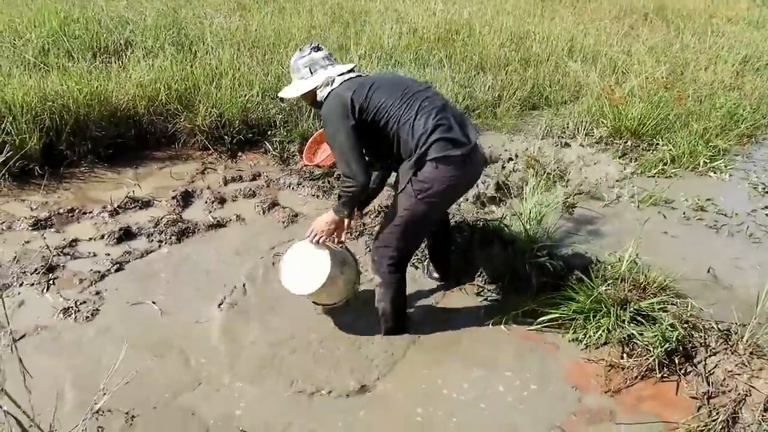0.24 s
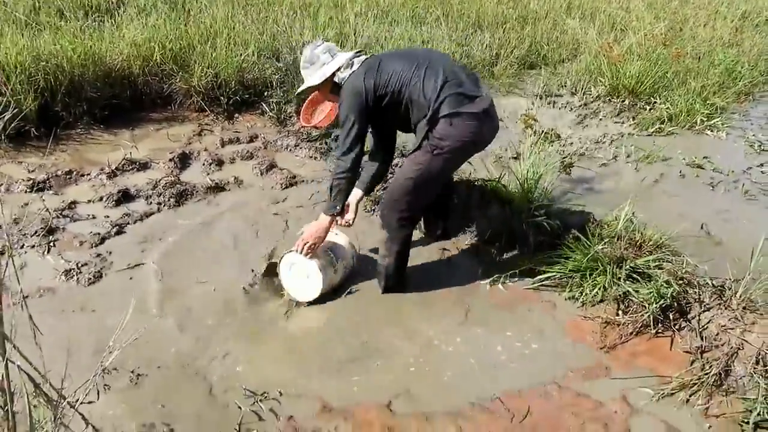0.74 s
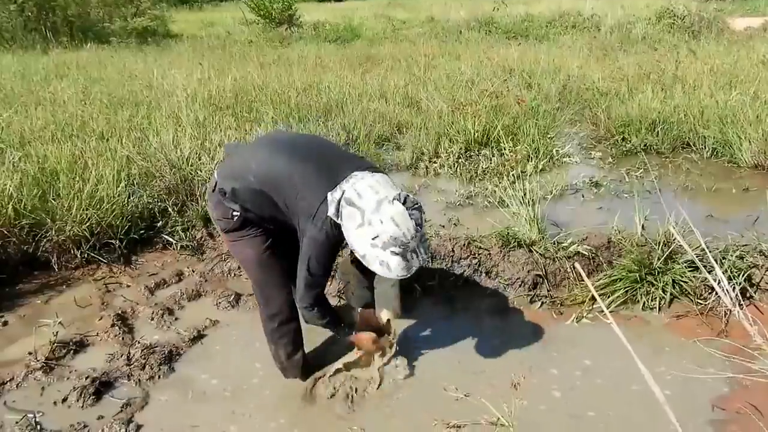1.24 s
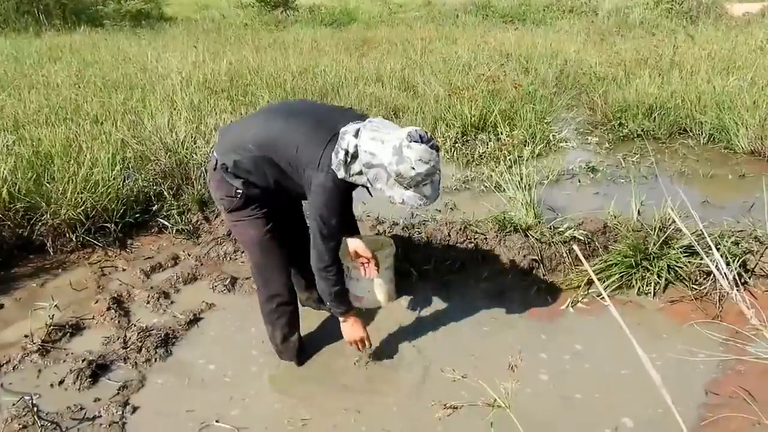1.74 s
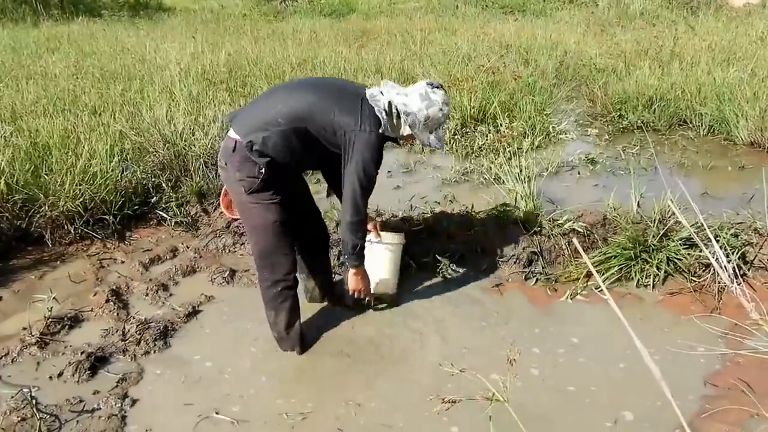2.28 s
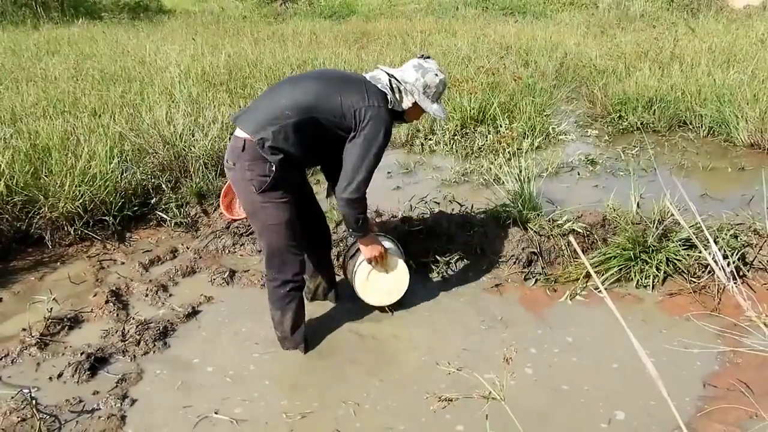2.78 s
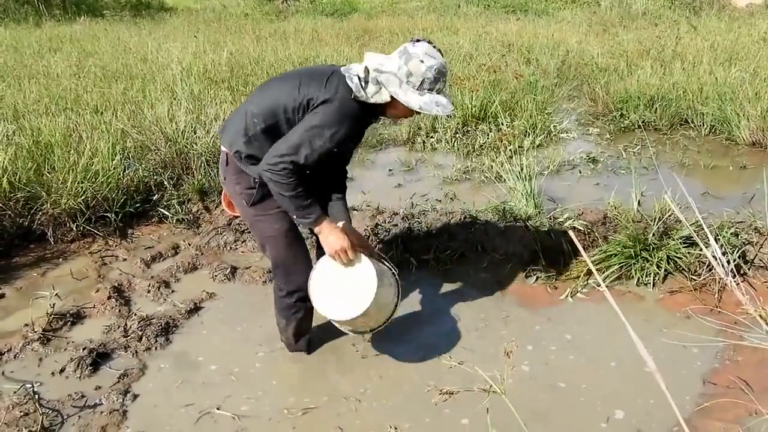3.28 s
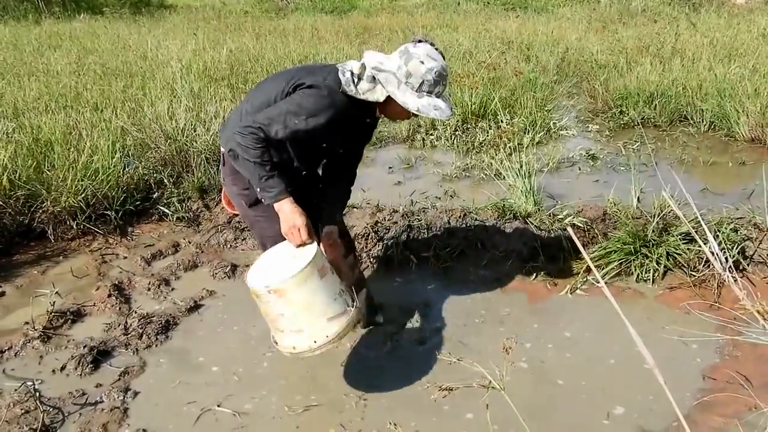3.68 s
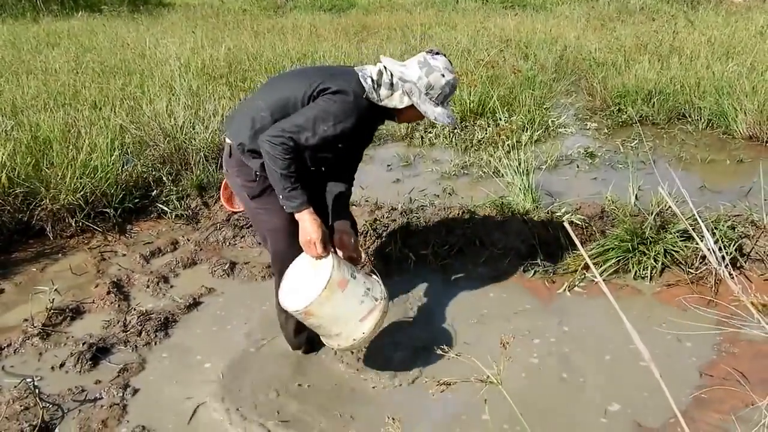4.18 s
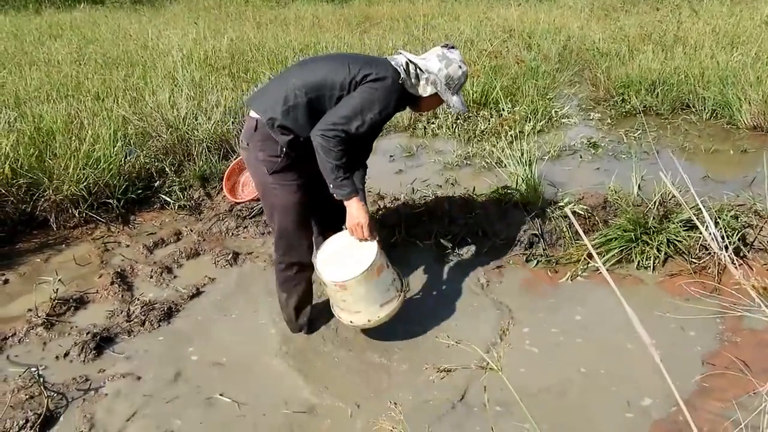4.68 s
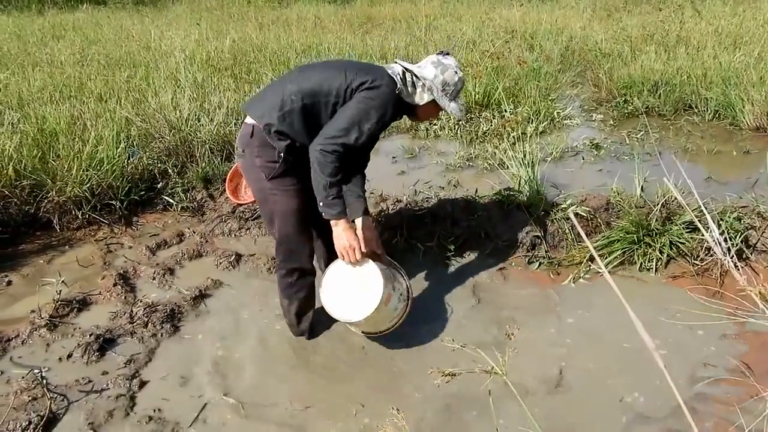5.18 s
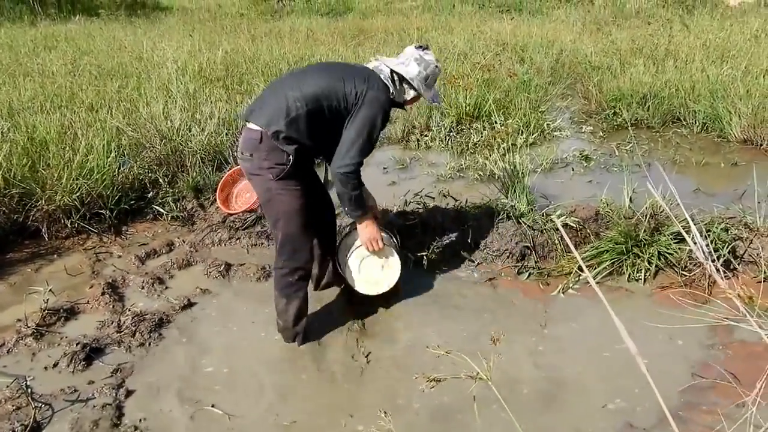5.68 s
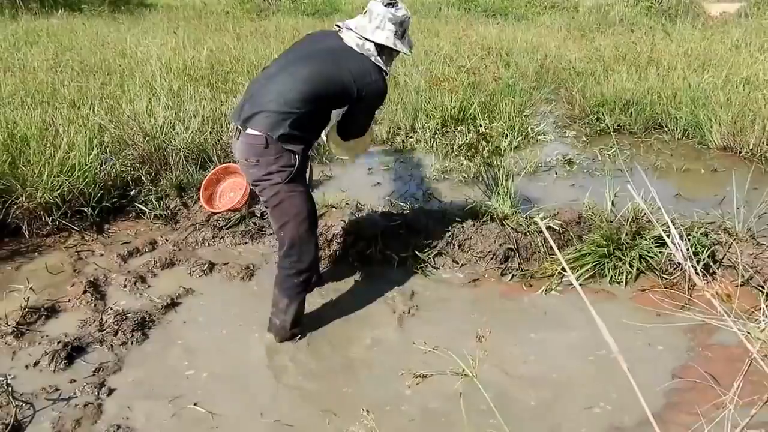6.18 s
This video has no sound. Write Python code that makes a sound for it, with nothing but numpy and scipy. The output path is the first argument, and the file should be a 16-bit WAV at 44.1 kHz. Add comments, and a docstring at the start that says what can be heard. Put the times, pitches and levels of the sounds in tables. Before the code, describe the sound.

A plastic bucket sloshes in a shallow muddy pool, heard from nearby in an open field. The loudest splash comes right at the start, with gurgling bubbles, hissing spray and a hollow thump. At 0.5 seconds everything cuts to silence until about 1 second. A faint low drone of distant traffic and two wavering engines then runs underneath. Several lighter splashes follow from 1.2 to 1.7 seconds. Between 2 and 3.5 seconds the water is quieter, with scattered drips, plops and small wet slaps, and soft bucket thumps near 2.5 seconds. From 3.7 to 4.5 seconds comes fuller sloshing and gurgling, with more dull thumps and a sharp wet slap. A lull follows, with a very faint high insect shrill around 5.4 seconds. Splashing returns at 5.6 seconds, peaks near 6 and dies away by 6.4 seconds.

```python
"""Rinsing a bucket in a muddy pool

A plastic bucket is sloshed in shallow water in an open field. Trapped air rings as gurgling bubbles,
spray hisses, drops plop, tick and slap, and the hollow bucket thumps. Far traffic and two engines
drone below; an insect shrills faintly. One splash, half a second of silence, then a longer stretch."""
import sys
import numpy as np
from scipy import signal
from scipy.fft import rfft, irfft
from scipy.io import wavfile

SR = 44100
rng = np.random.default_rng(int(sys.argv[2]) if len(sys.argv) > 2 else 0)


def dump_mix(stems):
    """Bounce the given channels to the path in sys.argv[1] as a 16-bit WAV at rate SR."""
    frames = np.atleast_2d(stems).T  # one column per channel
    limited = np.clip(frames, -1, 1)  # hard clip at full scale
    pcm = np.round(limited * 32767).astype(np.int16)
    wavfile.write(sys.argv[1], SR, pcm)


N = 284004
FIELD_PAN_DB, WATER_PAN_DB, BUCKET_PAN_DB, DROP_SCATTER_DB = 2.0, 1.5, -4, 3.5   # left minus right
SILENCE_S = (0.4985, 1.024)

def from_db(db):
    """Amplitude ratio of a level in decibels."""
    return 10 ** (np.asarray(db) / 20)

def rms_one(x):
    """Normalisation to unit rms."""
    return x / np.sqrt(np.mean(x ** 2) + 1e-20)

def in_time(rows):
    """Linear interpolation of each column in time."""
    s, *columns = np.transpose(rows)
    return [np.interp(np.arange(N) / SR, s, c) for c in columns]

def at_hz(points, hz):
    """Interpolation on a log-frequency axis."""
    freqs, values = np.transpose(points)
    return np.interp(np.log(hz), np.log(freqs), values)

def panned(db):
    """Left and right gains for a level difference."""
    return from_db(np.array([[db / 2], [-db / 2]]))

def band(x, low_hz, high_hz, order=2):
    """Butterworth band-pass filtering."""
    return signal.sosfilt(signal.butter(order, [low_hz, high_hz], "band", fs=SR, output="sos"), x)

def resonator(hz, cycles):
    """Poles of a damped oscillator that loses 60 dB in the given cycles."""
    r = from_db(-60 * hz / (cycles * SR))
    return [1, -2 * r * np.cos(2 * np.pi * hz / SR), r * r]

def drift(hz):
    """Random modulation: unit-rms noise, low-passed at hz."""
    r = np.exp(-80 * np.pi * hz / SR)
    slow = signal.lfilter([1], [1, -2 * r, r * r], rng.standard_normal(N // 40 + 2002))[2000:]
    return np.interp(np.arange(N) / 40, np.arange(len(slow)), rms_one(slow))

def coloured(pair, spectrum, coherence):
    """Mid-side mixing to a given spectrum and left-right coherence."""
    hz = np.maximum(np.fft.rfftfreq(N, 1 / SR), 1)
    alike = np.clip(at_hz(coherence, hz), 0, 1)
    mid, side = rfft(pair) * from_db(at_hz(spectrum, hz))
    return rms_one(irfft(np.sqrt(1 + alike) * mid + np.sqrt(1 - alike) * side * [[1], [-1]], N))

def grains(per_s, spread_db):
    """A Poisson process of clicks, mostly small, a few large."""
    sizes = from_db(spread_db * np.minimum(rng.exponential(1, N), 5)) * rng.choice([-1, 1], N)
    return sizes * (rng.random(N) < per_s / SR)

def add(out, s, sound):
    """Superposition of a short stereo sound at time s."""
    i = max(round(s * SR), 0)
    out[:, i:i + sound.shape[1]] += sound[:, :N - i]

def bubble(hz, t60, rise, swell_s):
    """A damped sine whose pitch climbs, as a bubble's does near the surface."""
    t = np.arange(round(t60 * SR) + 8) / SR
    shape = (1 - np.exp(-t / swell_s)) * from_db(-60 * t / t60)
    return shape / shape.max() * np.sin(2 * np.pi * hz * (t + rise * t ** 2 / (2 * t60)))

# Spectrum of far traffic and air: f/Hz, relative density/dB
FAR_SPECTRUM = [(15, -57), (25, -27), (65, -2), (150, -7), (204, -8), (300, -14.5), (388, -28.5),
                (858, -31.5), (1710, -37), (9540, -43), (11400, -50.5), (14800, -52), (22000, -120)]
# Its envelope: t/s, level/dB
FAR_LEVEL = [(0, -38.5), (.5, -44), (1.03, -40), (1.7, -40), (4, -38), (6.44, -41)]

def far_traffic():
    """A diffuse field: sound from all round is coherent only at low frequencies."""
    level_db = in_time(FAR_LEVEL)[0] + drift(7.8)
    coherence = [(300, 0.91), (560, 0.13), (5000, 0.07)]
    return from_db(level_db) * coloured(rng.standard_normal((2, N)), FAR_SPECTRUM, coherence)

# Slow swell of stirred water: t/s, gurgle level/dB, spray level/dB
SWELL = [(0, -45, -33.5), (0.09, -26, -25), (.24, -31.5, -30), (0.3, -37, -38.5), (0.5, -41.5, -36),
         (1.03, -61, -59), (1.13, -66.5, -55), (1.85, -56, -44), (1.95, -68, -55.5), (2.55, -50.5, -52.5),
         (2.81, -55, -55.5), (3.3, -58, -52.5), (3.5, -56.5, -59.5), (3.68, -42.5, -47), (3.88, -37, -35),
         (4.18, -36.5, -40), (4.4, -35.5, -44), (4.5, -36.5, -39), (4.8, -55.5, -48.5),
         (5.02, -47.5, -49.5), (5.15, -61.5, -59), (5.57, -72, -59.5), (5.85, -47, -40),
         (6.06, -39.5, -39.5), (6.44, -58, -49)]
# Single splashes: t/s, hold/s, gurgle level/dB, spray level/dB
SPLASH_BURSTS = [(0.12, 0.042, -20.5, -21), (0.18, 0.018, -25, -28.5), (0.376, 0.05, -37.5, -32.5),
                 (1.163, .03, -39.5, -36), (1.208, 0.11, -35, -36), (1.387, 0.1, -44.5, -37),
                 (1.488, 0.057, -40, -43), (1.565, 0.071, -40, -35), (1.676, 0.036, -39.5, -34),
                 (2.845, 0.018, -37.5, -43.5), (3.573, 0.015, -45, -52), (3.901, 0.072, -32, -52),
                 (4.016, 0.0061, -32, -32), (4.204, 0.013, -48.5, -37.5), (4.282, 0.096, -33, -37),
                 (4.441, .015, -37, -61), (5.604, 0.14, -47.5, -39), (5.711, 0.023, -41, -38.5),
                 (5.806, 0.018, -43.5, -43), (5.946, 0.03, -33, -28.5)]

def water_levels(rise_db_per_s=697.5, fall_db_per_s=294.5):
    """Incoherent sources add in power: swell plus splashes give the gurgle and spray levels."""
    t, power = np.arange(N) / SR, from_db(in_time(SWELL)) ** 2
    for s, hold_s, *peak_db in SPLASH_BURSTS:
        below_db = rise_db_per_s * np.maximum(s - t, 0) + fall_db_per_s * np.maximum(t - s - hold_s, 0)
        power += from_db(np.array(peak_db)[:, None] - np.minimum(below_db, 200)) ** 2
    return 10 * np.log10(power)

# Spectrum of the bubble swarm: f/Hz, relative density/dB
GURGLE_SPECTRUM = [(210, -32), (350, 0), (497, -16.5), (660, -0.5), (884, 0), (2390, -1.5), (3270, -13.5),
                   (4680, -43.5)]
# Small bubbles are bright, large ones dark: t/s, tilt/(dB per octave)
GURGLE_TILT = [(0, 14), (.13, -3), (.42, -4), (1.16, 2.5), (1.27, -5), (1.55, 5.5), (1.9, 1.5), (3.6, -1.5),
               (4.5, -3.5), (4.8, 1), (5.6, -0.5), (6, -4), (6.44, -3)]

def gurgle(level_db):
    """Bubble resonance: each pocket of air rings briefly at its own pitch, over a smooth rush."""
    swarm, tilt = from_db(3 * drift(21)), in_time(GURGLE_TILT)[0]
    crowd = 1 + from_db(level_db + 26)   # violent water makes more bubbles: twice as many at -26 dB
    clicks = rms_one(grains(1800 * swarm * crowd, spread_db=3.5) / np.sqrt(crowd))
    size_class = rng.integers(0, 28, N)
    shared_rush, side_rush = rng.standard_normal((2, N)), rng.standard_normal((2, 2, N))
    out, power = np.zeros((2, N)), 0
    for k, hz in enumerate(np.geomspace(380, 4200, 28)):
        drive = clicks * (size_class == k) + .09 * shared_rush[k % 2] + .055 * side_rush[k % 2]
        poles = resonator(hz, cycles=21)
        rung = rms_one(signal.lfilter([1], poles, signal.lfilter([1], poles, drive)))   # soft onset
        gain = from_db(at_hz(GURGLE_SPECTRUM, hz) + tilt * np.log2(hz / 1300)) * np.sqrt(hz)
        out += rung * gain * from_db(2 * drift(5.8)) * panned(WATER_PAN_DB)
        power += gain ** 2
    return from_db(level_db + 2.13 * drift(9.2)) * out / np.sqrt(power)   # uneven surges

# Spectrum of the spray: f/Hz, relative density/dB
SPRAY_SPECTRUM = [(900, -40), (1500, -10), (2630, -8), (3300, -9.5), (4700, -6), (5930, -9.5), (9150, -5),
                  (10200, -11), (11400, -21.5), (14800, -46.5), (22000, -120)]

def spray(level_db):
    """Shot noise: clumps of droplets ping over patchy hiss."""
    clump = from_db(2 * drift(38))
    clicks = rms_one(grains(1800 * clump, spread_db=3.2)) * np.clip((level_db + 74) / 15, 0, 1)
    size_class = rng.integers(0, 14, N)
    hiss, out = rng.standard_normal((2, 2, N)) * clump, np.zeros((2, N))
    for k, hz in enumerate(np.geomspace(1500, 15000, 14)):
        impacts = min(hz / 8000, 1) * clicks * (size_class == k) * [[1], [(-1) ** k / 2]]   # mid, side
        drive = impacts + .31 * hiss[k % 2] * from_db(3.27 * drift(15.6))
        rung = rms_one(signal.lfilter([1, 0, -1], resonator(hz, cycles=24), drive))
        out += rung * np.sqrt(hz) * (-1) ** k
    coherence = [(2500, 0.6), (11000, 0.38)]   # the near water is one source
    return from_db(level_db) * coloured(out, SPRAY_SPECTRUM, coherence) * panned(WATER_PAN_DB)

# Slops and plops: t/s, relative level/dB, f/Hz, roughness
PLOP_EVENTS = [(0.121, -9, 1460, 0.6), (0.1381, -4, 2250, 0.71), (0.229, -25, 704, 0.2),
               (1.186, -8.5, 1100, 0.24), (1.274, -27, 624, 0.14), (1.383, -27.5, 2930, 0.4),
               (1.55, -23, 2440, 0.62), (1.597, -19.5, 3830, 0.74), (1.613, -28, 3580, 0.2),
               (1.663, -23.5, 782, 0.5), (1.678, -16.5, 1483, 0.7), (1.9, -34.5, 3620, 0),
               (1.912, -28.5, 2260, 0.42), (2.182, -24, 994, 0.77), (2.378, -27, 1304, 0.45),
               (2.387, -22.5, 1610, 0.26), (2.468, -18, 715, 0.48), (2.568, -28.5, 2150, 0.6),
               (2.839, -24.5, 1360, 0.5), (2.978, -32.5, 1350, 1.1), (3.015, -30, 776, 0.36),
               (3.082, -34, 810, 0.7), (3.192, -35, 2310, 0.36), (3.575, -28.5, 1200, 1.1),
               (3.59, -25.5, 970, 0.68), (3.731, -25.5, 1980, 0.6), (3.912, -25.5, 797, 0),
               (4.069, -21, 2350, 0.37), (4.199, -15.5, 1550, 0.55), (4.262, -19, 1090, 1.07),
               (4.287, -17, 904, 0.42), (4.318, -21.5, 690, 0.25), (4.355, -27, 910, 0.4),
               (4.457, -24, 1240, 0.96), (4.633, -28, 766, 0.15), (4.74, -29.5, 2180, 0.34),
               (5.018, -29.5, 1000, 1.06), (5.722, -28, 1640, 0.37), (5.734, -28.5, 1670, 0.1),
               (5.813, -31, 1760, 0.15), (5.993, -26.5, 718, 0.2), (6.006, -19.5, 1490, 0.34),
               (6.032, -26, 1790, 0.27), (6.103, -24, 1310, 0.9), (6.203, -23, 1074, 0.44),
               (6.277, -32, 910, 0.54)]

def plops():
    """Air entrainment: a smooth plop rings one bubble, a rough one a scatter of small ones."""
    out = np.zeros((2, N))
    for s, db, hz, rough in PLOP_EVENTS:
        chance = rng.standard_normal((10, 3))
        side = panned(WATER_PAN_DB + DROP_SCATTER_DB * chance[0, 0])
        rough = np.clip(rough, 0, 1)
        main = bubble(hz, 0.018 + 15 / hz, rise=0.2, swell_s=0.0029)
        add(out, s, (1 - rough) * from_db(db) * main * side)
        for late, octaves, size in chance[1:]:
            pitch = np.clip(hz * 2 ** (0.28 + 0.57 * octaves), 650, 6000)
            small = bubble(pitch, 11 / pitch, rise=0.75, swell_s=0.00017)
            add(out, s + .007 * abs(late), rough * from_db(db - 5 + 3 * size) * small * side)
    return out

# Drops striking the surface: t/s, relative level/dB, centre f/Hz
DROP_IMPACTS = [(0.1376, -17, 3420), (0.149, 0, 8700), (0.1576, -4, 9300), (0.163, -5.5, 4830),
                (1.1518, -20, 7850), (1.254, -21, 9000), (1.2778, -16, 8600), (1.336, -23.5, 5500),
                (1.4288, -17.5, 6000), (1.515, -21.5, 7900), (1.658, -24, 5460), (1.781, -35, 8400),
                (1.832, -25.5, 8500), (2.199, -36, 7000), (2.3492, -29.5, 5450), (2.367, -28.5, 8100),
                (2.4767, -18, 7400), (2.5207, -28, 4780), (2.579, -21.5, 9200), (2.613, -26, 8650),
                (2.841, -25, 4920), (2.8455, -23, 9100), (3.0984, -31, 9200), (3.2022, -29.5, 9440),
                (3.211, -23.5, 9100), (3.2864, -31, 8900), (3.2956, -28, 8620), (3.4096, -27.5, 8100),
                (3.535, -28.5, 5460), (3.856, -19, 8200), (3.929, -17, 8800), (4.044, -19, 6260),
                (4.11, -21, 9600), (4.377, -20, 4460), (4.814, -28.5, 9100), (5.6294, -22, 8000),
                (5.716, -12, 8500), (5.748, -18.5, 9300), (5.953, -15.5, 9700), (5.9703, -23, 4900),
                (6.136, -24.5, 8920)]

def ticks():
    """Impact noise: a drop gives a narrow-band ping and a longer broadband spatter."""
    t, out = np.arange(900) / SR, np.zeros((2, N))
    for s, db, hz in DROP_IMPACTS:
        noise = rng.standard_normal(len(t))
        spatter = 0.59 * noise * (1 - np.exp(-t / 0.0022)) * from_db(-60 * t / 0.031)
        narrow = rms_one(band(noise, hz / 1.26, hz * 1.21))
        ping = 1.06 * narrow * (1 - np.exp(-t / 0.0003)) * from_db(-60 * t / 0.0069)
        add(out, s, from_db(db) * (spatter + ping) * panned(WATER_PAN_DB + DROP_SCATTER_DB * noise[0]))
    return band(out, 3300, 10300, order=4)

# Thumps of the bucket: t/s, relative level/dB, f/Hz, swell/s
BUCKET_THUMPS = [(0.189, -13, 258, 0.0028), (1.677, -26, 400, 0.017), (2.464, -16.5, 275, 0.003),
                 (2.566, -15.5, 247, 0.041), (3.822, -19, 340, 0.034), (3.942, -13, 258, 0.003),
                 (4.282, -31, 408, 0.0081), (4.392, -18.5, 268, 0.0014), (5.696, -16, 162, 0.0041),
                 (5.966, -21, 328, 0.006)]

def bucket():
    """Damped resonance of a hollow body: a low tone within a band of sloshing noise."""
    t, out = np.arange(round(.15 * SR)) / SR, np.zeros((2, N))
    for s, db, hz, swell_s in BUCKET_THUMPS:
        slosh = rms_one(band(rng.standard_normal(len(t)), hz / 1.98, hz * 1.58))
        slosh *= (1 - np.exp(-t / swell_s)) * from_db(-60 * t / 0.12)
        tone = bubble(hz, 0.06, rise=0.095, swell_s=swell_s)
        add(out, s, from_db(db - 10) * slosh * panned(BUCKET_PAN_DB))
        add(out, s, from_db(db - 13.5) * tone * panned(BUCKET_PAN_DB))
    return out

# Two far engines, a list each: t/s, firing f/Hz, level/dB
ENGINE_NOTES = [
    [(1.03, 67, -39.5), (2.5, 73, -37.5), (3.8, 77, -39), (4.9, 80, -43.5), (5.4, 70, -44), (6.44, 67, -48)],
    [(1.03, 101, -41.5), (1.6, 97, -33.5), (2.3, 91, -41), (3.1, 85, -45.5), (4, 82, -45)],
]

def engines():
    """Periodic firing: each engine gives a wavering fundamental and its octave."""
    out = np.zeros(N)
    for rows, octave_db in zip(ENGINE_NOTES, (-5, -14)):
        hz, level_db = in_time(rows)
        phase = 2 * np.pi * np.cumsum(hz * (1 + 0.0114 * drift(9.2))) / SR
        fundamental = np.sin(phase) * from_db(0.64 * drift(4.5))
        octave = np.sin(2 * phase) * from_db(octave_db + 3.6 * drift(42))
        out += from_db(level_db) * (fundamental + octave)
    return out * (np.arange(N) > SILENCE_S[1] * SR)

# Short wet slaps: t/s, peak level/dB, f/Hz
WET_SLAPS = [(1.685, -22, 1480), (2.467, -24, 2680), (3.003, -29, 2100), (2.469, -16, 1540),
             (2.831, -26, 1500), (2.8478, -20, 1590), (2.869, -30, 1400), (2.882, -16.5, 1640),
             (4.272, -9.5, 1250), (4.4557, -20, 1310)]

def slaps():
    """Heavy damping: each slap loses 60 dB in five cycles."""
    out = np.zeros((2, N))
    for s, db, hz in WET_SLAPS:
        add(out, s, from_db(db) * bubble(hz, 5 / hz, rise=0, swell_s=0.00025) * panned(WATER_PAN_DB))
    return out

# Faint shrill of an insect: t/s, level/dB
INSECT_LEVEL = [(4.9, -70), (5.4, -61), (5.7, -72)]

def insect():
    """Amplitude modulation: a narrow band of noise near 9.5 kHz flickers."""
    shrill = rms_one(band(rng.standard_normal(N), 9200, 9750))
    return from_db(in_time(INSECT_LEVEL)[0] + 5.8 * drift(15)) * shrill

def scene():
    """Superposition of the near water and the open field."""
    gurgle_db, spray_db = water_levels()
    near = gurgle(gurgle_db) + spray(spray_db) + plops() + bucket() + ticks() + slaps()
    return near + (far_traffic() + engines() + insect()) * panned(FIELD_PAN_DB)

def record(dry, offset=-.0019, fade_s=0.0069, cutoff_hz=15800):
    """Steady offset, hard clipping, a gate for the silence, and a low-pass filter."""
    t = np.arange(N) / SR
    gate = np.clip(np.maximum(SILENCE_S[0] - t, t - SILENCE_S[1]) / fade_s + .5, 0, 1)
    low_pass = signal.cheby2(12, 70, cutoff_hz, fs=SR, output="sos")
    return signal.sosfilt(low_pass, np.clip(dry + offset, -1, 1) * gate)

dry = scene()
out = record(dry)
dump_mix(out)
```